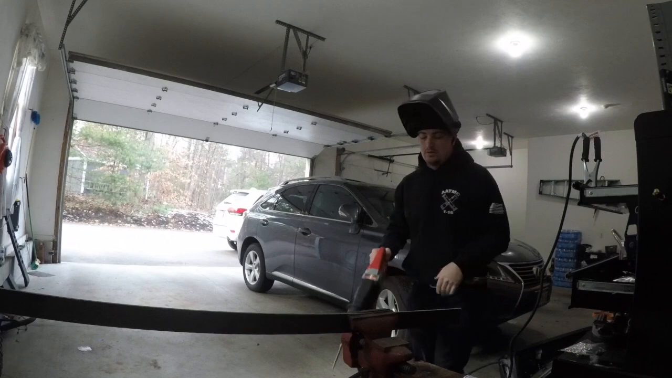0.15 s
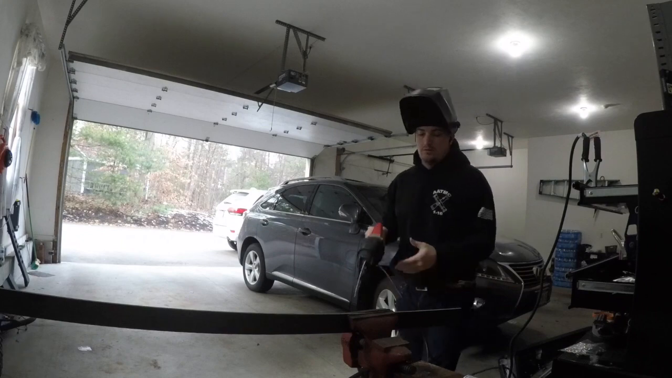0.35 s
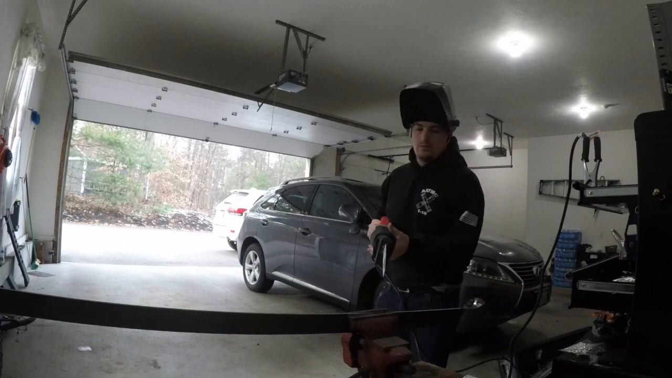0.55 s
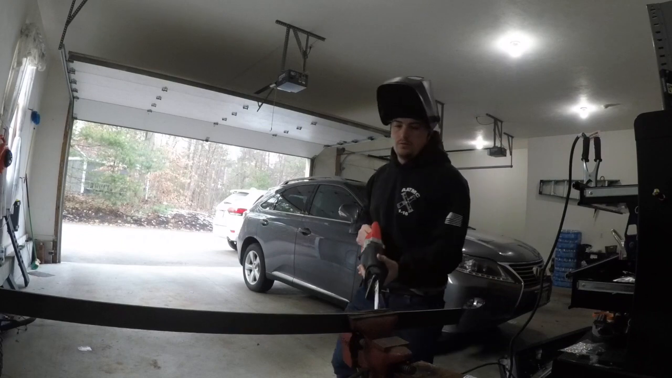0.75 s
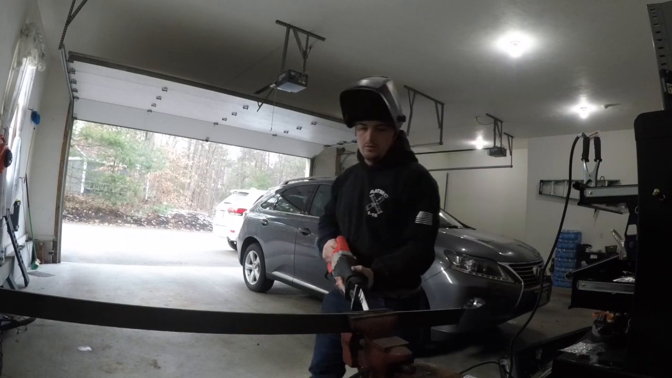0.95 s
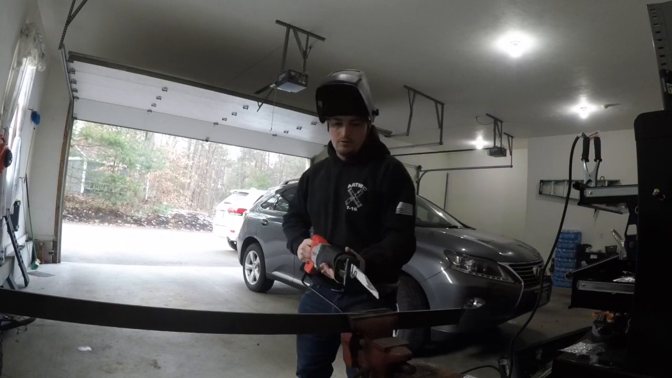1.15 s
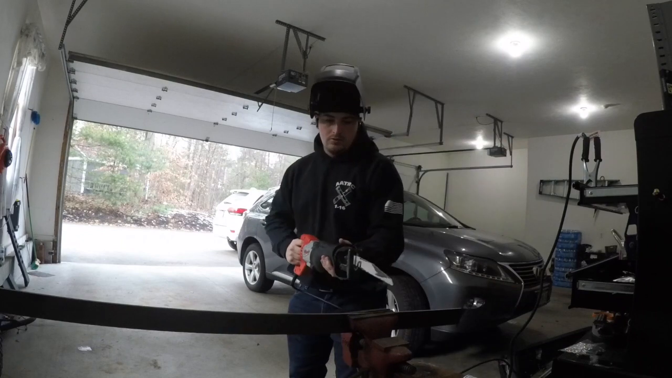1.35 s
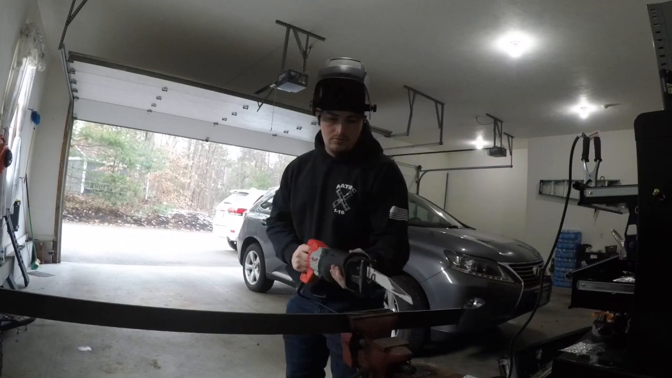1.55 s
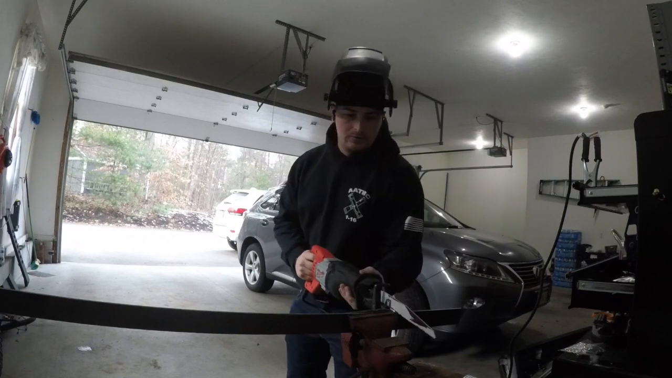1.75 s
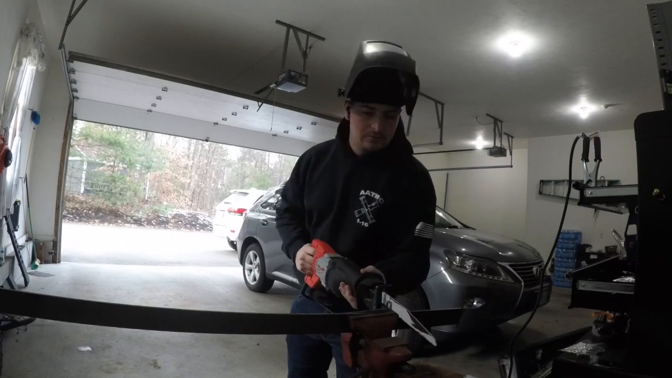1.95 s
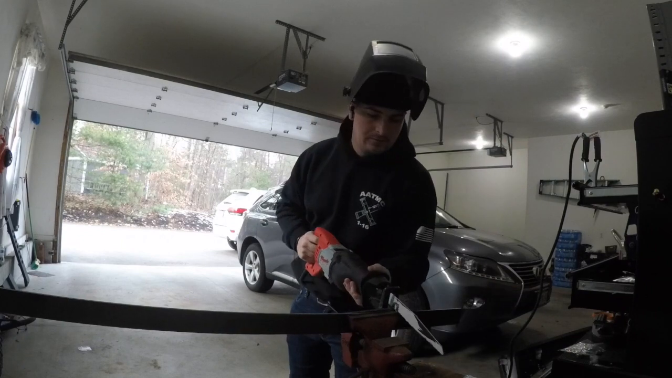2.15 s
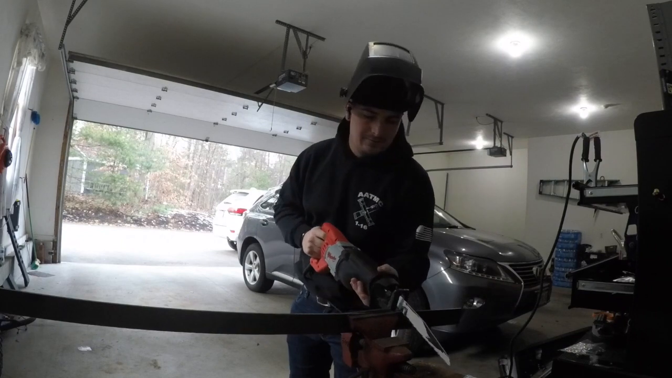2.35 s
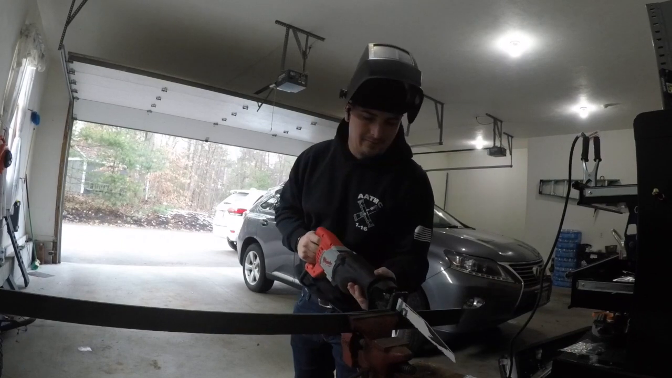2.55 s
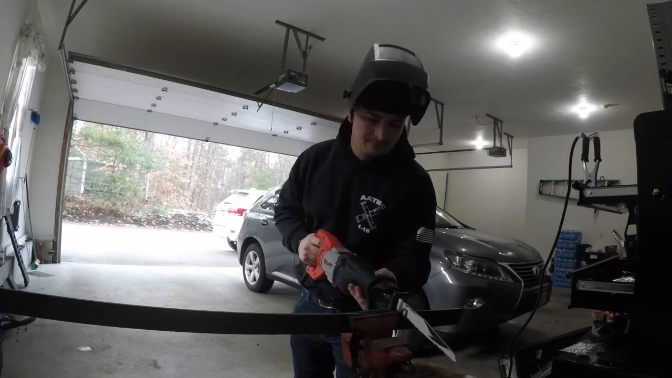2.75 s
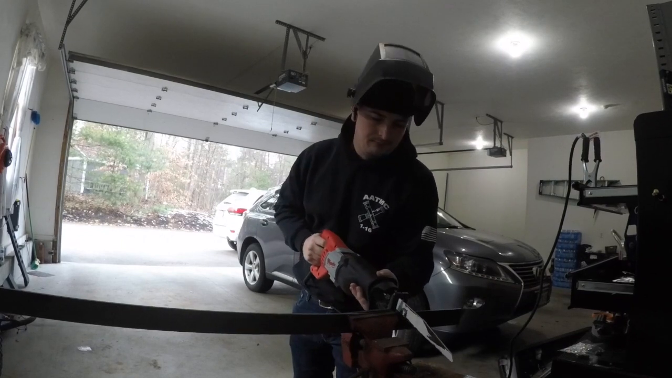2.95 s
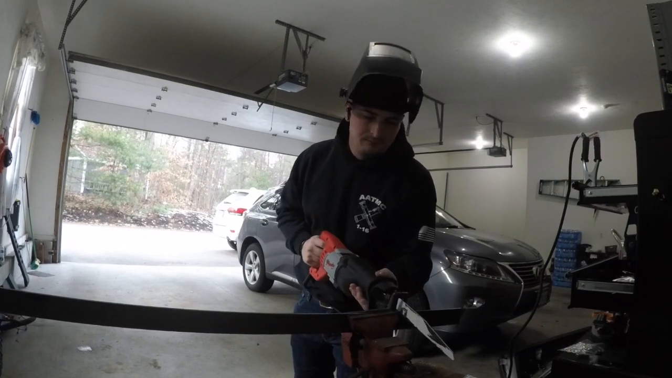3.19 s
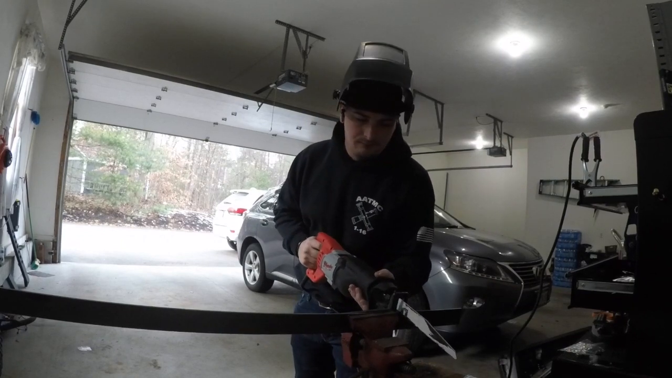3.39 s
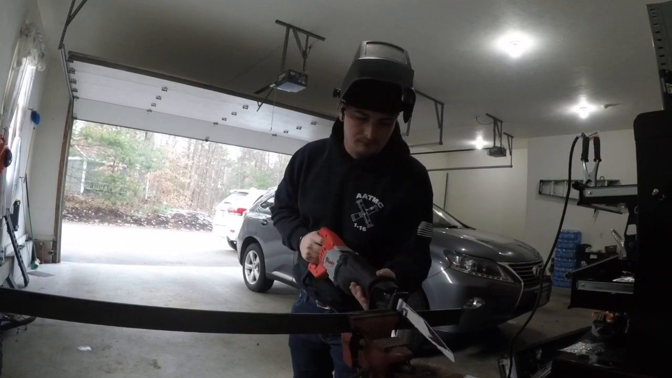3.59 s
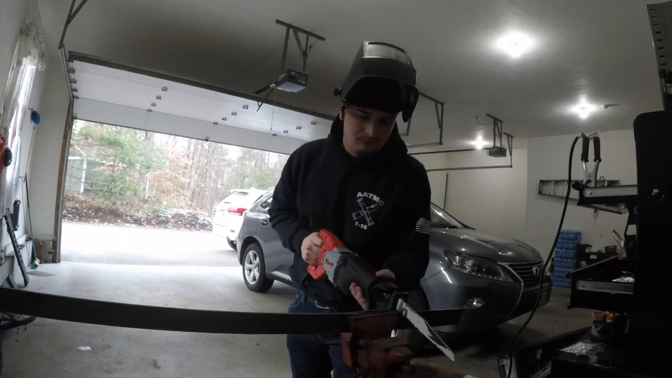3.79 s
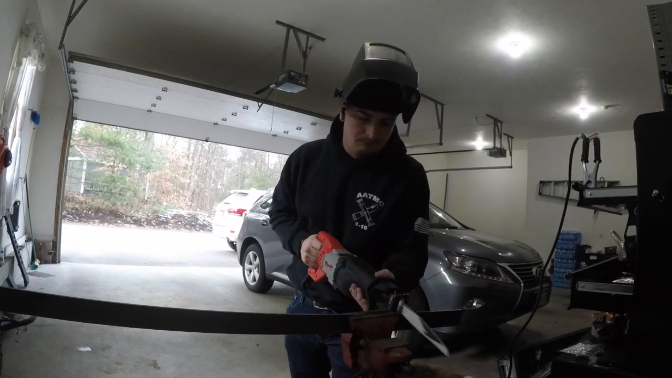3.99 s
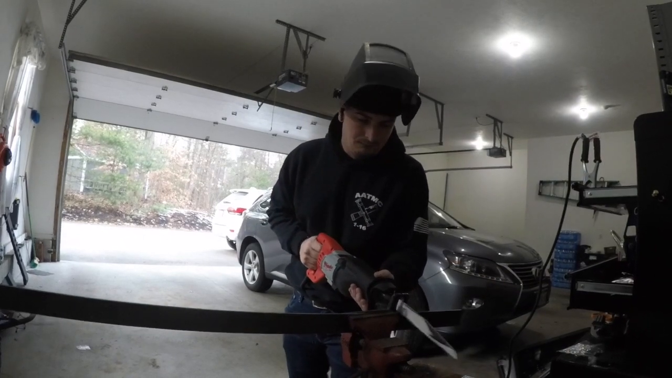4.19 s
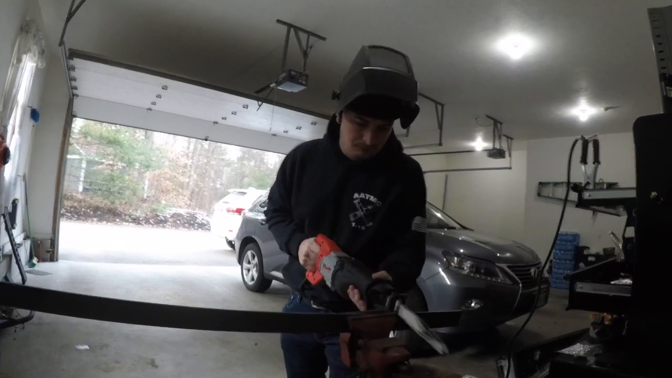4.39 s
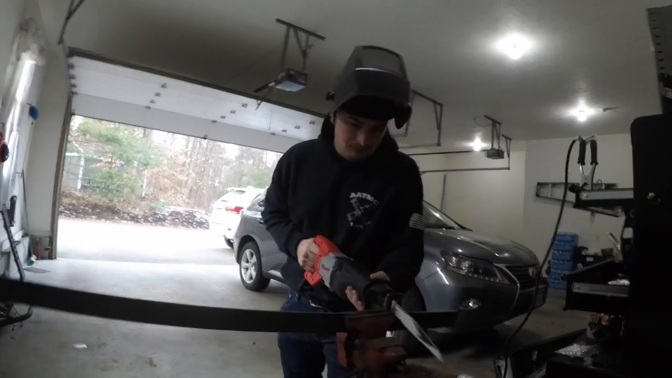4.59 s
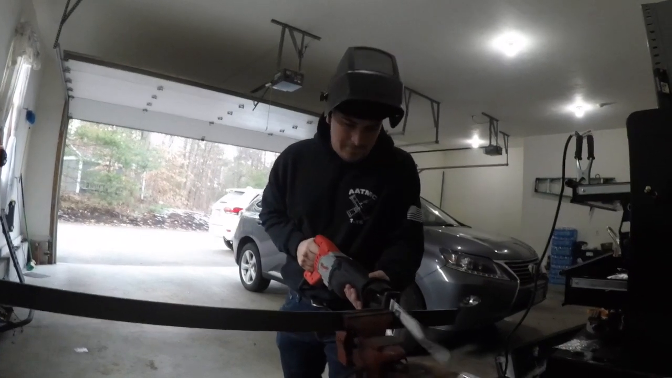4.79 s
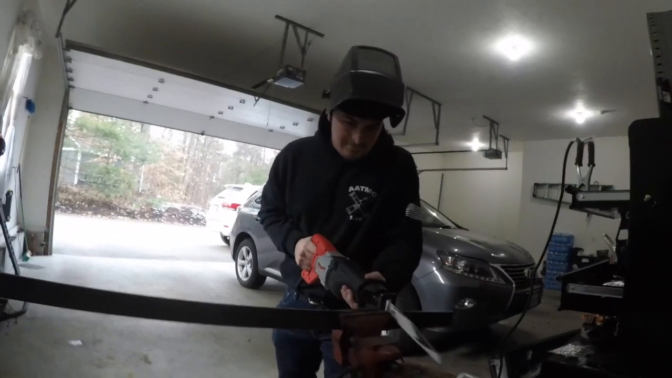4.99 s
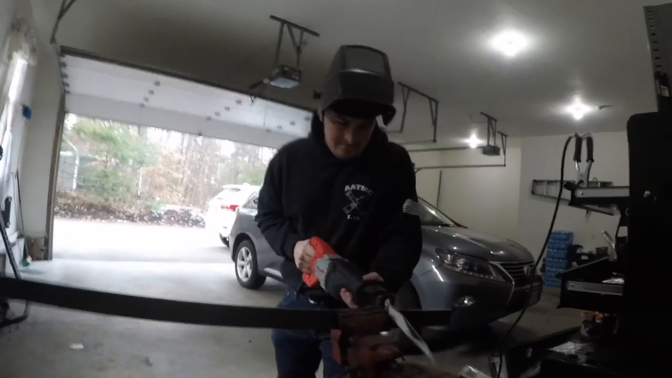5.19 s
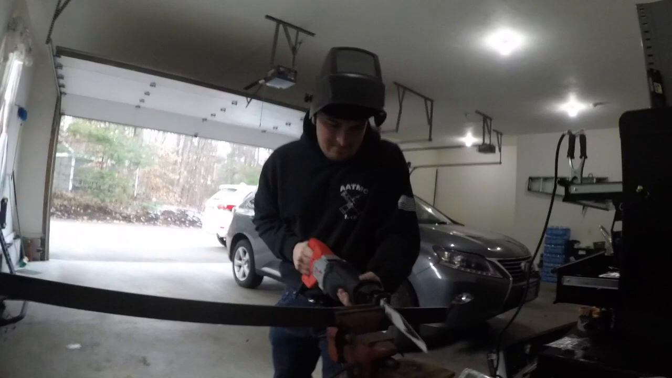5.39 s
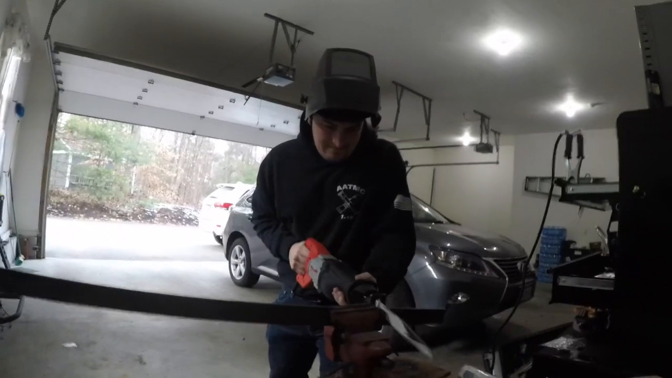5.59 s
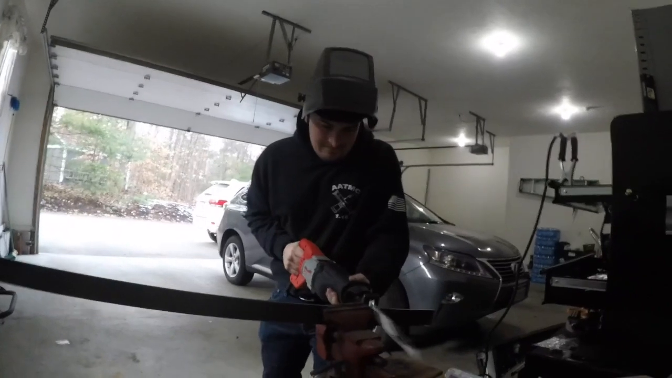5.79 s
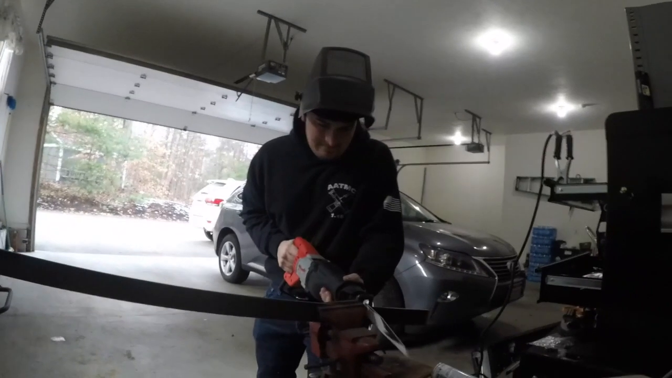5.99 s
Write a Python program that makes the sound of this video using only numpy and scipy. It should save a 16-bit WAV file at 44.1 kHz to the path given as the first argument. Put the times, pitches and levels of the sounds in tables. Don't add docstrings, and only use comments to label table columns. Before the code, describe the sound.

In an open garage, a power saw is handled with rattles and clicks, its blade taps a ringing clamped steel bar, then it cuts with harsh rapid chatter.

```python
import sys
import numpy as np
from scipy import signal
from scipy.fft import rfft, irfft
from scipy.io import wavfile

SR = 44100
rng = np.random.default_rng(int(sys.argv[2]) if len(sys.argv) > 2 else 0)


def elevation(decibels):
    levels = np.asarray(decibels, float)
    return 10 ** (levels / 20)


def master(y):
    cut = np.clip(np.atleast_2d(y).T, -1, 1)
    pcm = np.round(cut * 32767)
    wavfile.write(sys.argv[1], SR, pcm.astype(np.int16))


N = 266364


def rms_one(x):
    return x / np.sqrt(np.mean(x ** 2) + 1e-20)


def in_time(points):
    s, level_db = np.transpose(points)
    return np.interp(np.arange(N) / SR, s, level_db)


def at_hz(points, hz):
    table_hz, values = np.transpose(points)
    return np.interp(np.log(hz), np.log(table_hz), values)


def click_at(s):
    return 1. * (np.arange(N) == int(s * SR))


def colour(x, spectrum):
    cepstrum = irfft(np.log(elevation(at_hz(spectrum, np.linspace(1, SR / 2, 2049)))))
    cepstrum[1:2048] *= 2
    cepstrum[2049:] = 0
    return signal.fftconvolve(x, irfft(np.exp(rfft(cepstrum))))[:N]


def band(x, low_hz, high_hz):
    sos = signal.butter(2, [low_hz, min(high_hz, .45 * SR)], "band", fs=SR, output="sos")
    return signal.sosfilt(sos, x)


def ring(x, hz, t60):
    r = elevation(-60 / (t60 * SR))
    w = 2 * np.pi * hz / SR
    return signal.lfilter([0, np.sin(w)], [1, -2 * r * np.cos(w), r * r], x + 1e-18)


def resonances(x, peaks):
    out = 0
    for hz, width, level_db in peaks:
        r = np.exp(-np.pi * width / SR)
        poles = [1, -2 * r * np.cos(2 * np.pi * hz / SR), r * r]
        out = out + elevation(level_db) * signal.lfilter([1 - r, 0, r - 1], poles, x)
    return out


def grains(per_s, spread_db):
    sizes = elevation(spread_db * np.minimum(rng.exponential(1, N), 4)) * rng.choice([-1, 1], N)
    return rms_one(sizes * (rng.random(N) < per_s / SR))


def pulses(times, levels_db, rise, fall):
    marks = np.zeros(N)
    marks[(np.array(times) * SR).astype(int)] = elevation(levels_db)
    t = np.arange(SR // 4) / SR
    shape = (1 - np.exp(-t / rise)) * np.exp(-t / fall)
    return signal.fftconvolve(marks, shape / shape.max())[:N]


def held(rows, attack_db_per_s, floor_db=-120):
    t = np.arange(N) / SR
    levels = []
    for start, end, level_db, release in rows:
        before, after = np.maximum(start - t, 0), np.maximum(t - end, 0)
        levels.append(level_db - attack_db_per_s * before - release * after)
    return np.maximum(np.max(levels, axis=0), floor_db)


def struck(times, levels_db, modes, scatter_db, damping):
    out, at = np.zeros(N), (np.array(times) * SR).astype(int)
    luck = rng.standard_normal((len(at), len(modes)))
    for k, (hz, level_db, t60) in enumerate(modes):
        clicks = np.zeros(N)
        clicks[at] = elevation(levels_db + level_db + scatter_db * luck[:, k])
        out += ring(clicks, hz, t60 * damping)
    return out


def bursts(times, levels_db, centres_hz, lengths=.004, broad=0, span=1.324):
    noise, out = rng.standard_normal(N + SR), np.zeros(N + SR)
    t = np.arange(SR // 5) / SR
    starts, lengths = (times * SR).astype(int), np.broadcast_to(lengths, len(times))
    for start, level_db, hz, length in zip(starts, levels_db, centres_hz, lengths):
        burst = noise[start:start + len(t)]
        tinted = rms_one(band(burst, hz / span, hz * span))
        shape = (1 - np.exp(-t / (0.046 * length))) * np.exp(-t / length)
        out[start:start + len(t)] += elevation(level_db) * (tinted + broad * band(burst, 1400, 7000)) * shape
    return out[:N]


def background():
    # (frequency [Hz], level [dB])
    yard = [(16, -9.5), (28, -21), (49, -16.5), (117, -25.5), (203, -22), (226, -19.5), (336, -20),
            (373, -18.5), (486, -21.5), (917, -22.5), (1260, -33), (1400, -30), (15500, -55)]
    # (frequency [Hz], width [Hz], rms level [dB])
    hum_lines = [(234, 5.4, -65), (368, 32, -69), (907, 3, -63.5)]
    # (start [s], end [s], level [dB], release [dB/s])
    rustles = [
        (.52, .6, -63.5, 150),
        (.98, 1.1, -53.5, 72),
        (1.93, 1.96, -57.5, 57),
        (2.43, 2.55, -59.5, 69),
        (3.42, 3.5, -77, 32),
    ]
    # (start [s], end [s], level [dB], release [dB/s])
    nudges = [
        (.27, .4, -53, 100),
        (.9, 1.0, -61, 60),
        (1.48, 1.55, -60, 60),
        (1.78, 1.88, -47, 87),
        (2.12, 2.2, -43.5, 29),
        (2.44, 2.53, -39, 187),
        (2.9, 3.0, -51.5, 10),
        (3.45, 3.57, -55, 110),
        (3.76, 3.9, -49, 40),
    ]
    # (time [s], frequency [Hz], level [dB], t60 [s])
    swings = [
        (2.575, 5.25, -31, 6.5),
        (2.79, 20.7, -38, 1.3),
        (2.45, 17, -25, .5),
    ]
    t = np.arange(N) / SR
    noise = rng.standard_normal((4, N))
    hush = elevation(-59.5 + 3) * rms_one(colour(noise[0], yard))
    hiss = elevation(-76) * noise[3]
    hum = 0
    for hz, width, level_db in hum_lines:
        unsteady = resonances(noise[1], [(hz, width, 0)])
        hum = hum + elevation(level_db) * rms_one(unsteady + .4 * np.sin(2 * np.pi * hz * t))
    rustle = elevation(held(rustles, 150, floor_db=-76)) * rms_one(band(noise[2], 1060, 6000))
    sway = np.sqrt(2) * np.sin(2 * np.pi * 21.5 * t)
    creak = elevation(-11.5) * rms_one(band(noise[1], 41, 77))
    nudged = elevation(held(nudges, 160, floor_db=-87)) * (sway + creak)
    swing = sum(elevation(level_db) * ring(click_at(s), hz, t60) for s, hz, level_db, t60 in swings)
    return hush + hiss + hum + rustle + nudged + swing


def ticks():
    # (time [s], crack level [dB], centre [Hz])
    dry_clicks = [(0.8775, -19, 6800), (1.1129, -38, 2397), (1.1797, -36, 2780), (1.96, -22, 3300),
                  (2.3194, -52, 2880), (2.417, -10, 3560), (2.7582, -32.5, 2500), (3.204, -49, 2930),
                  (3.3094, -51, 1520), (3.3856, -47, 4300), (3.4268, -21.5, 4060), (3.8764, -9, 2650),
                  (3.901, -19, 2500)]
    # (time [s], level [dB], centre [Hz], length [s])
    knocks = [(0.05, -43, 130, 0.021), (0.342, -44.5, 300, 0.031), (0.368, -49, 129, 0.046),
              (0.852, -44, 300, 0.022), (0.871, -46, 102, 0.03), (1.586, -53, 232, 0.026),
              (1.961, -43, 8700, .006), (2.381, -31, 9000, .006), (2.417, -31, 7700, .006),
              (2.46, -27, 67, 0.023), (2.6, -47, 75, .06), (2.75, -49, 700, 0.021),
              (2.751, -36.5, 202, 0.016), (2.8, -47, 110, .06), (3.205, -47.5, 1130, 0.014),
              (3.206, -47, 2407, 0.0087), (3.23, -53, 130, 0.024), (3.37, -53, 85, 0.07),
              (3.429, -50, 10650, 0.01), (3.434, -42.5, 1290, 0.011), (3.45, -45.5, 170, 0.025),
              (3.876, -38, 1400, 0.012), (3.88, -33, 300, 0.037), (3.927, -36, 2400, .03),
              (3.933, -46, 9500, .008), (3.951, -21, 1900, 0.04)]
    s, crack_db, centre_hz = np.transpose(dry_clicks)
    return bursts(s, crack_db - 13.5, centre_hz, broad=0.87) + bursts(*np.transpose(knocks))


def rattle():
    # (start [s], end [s], level [dB], release [dB/s])
    shakes = [
        (.8295, .9, -29, 147),
    ]
    # (frequency [Hz], level [dB])
    click_colour = [(120, -40), (200, -1), (842, -5.5), (923, -2), (1070, -9), (2290, 0.5), (3300, -5),
                    (6830, 0), (15500, -30.5)]
    # (frequency [Hz], width [Hz], level [dB])
    chuck = [(2320, 70, -2), (4510, 100, -8), (6770, 90, -2), (7420, 150, -1), (7950, 120, -3),
             (8400, 120, -2), (8930, 120, 0), (10300, 130, -8)]
    clicks = grains(7000, spread_db=3.5)
    voiced = rms_one(colour(clicks, click_colour)) + .4 * rms_one(resonances(clicks, chuck))
    first = bursts(np.array([.829]), [-31], [8400], .025, span=1.1)
    return elevation(held(shakes, attack_db_per_s=20000) - 7.5) * voiced + first


def taps():
    # (time [s], crack level [dB], bar ring level [dB], crack centre [Hz])
    touches = [(1.735, -17.5, -27, 7160), (1.9014, -26, -45, 2950), (1.926, -46, -44, 2930),
               (2.0679, -20, -35.5, 2760), (2.098, -25, -76, 2930), (2.1435, -17, -35.5, 3000),
               (2.195, -19, -32, 3030), (2.382, 0.5, -23, 2700), (2.401, -5, -24, 1360),
               (2.4313, -7, -56, 2280), (2.4697, -21, -37, 2960)]
    # (frequency [Hz], level [dB], t60 [s])
    bar = [(490, -2, .35), (807, -8, .45), (1260, -7, .25), (1340, -1, .35), (2040, -12, .16),
           (2250, -11, .3), (2719, -9, .12), (2840, -7, .3), (2934, 1, .16), (2960, -8, .35),
           (3550, -24, .2), (4690, -17, .2), (4760, -17, .2), (6780, -21, .18), (6860, -22, .15),
           (8300, -22, .12), (8650, -23, .13), (9400, -21, .13), (9550, -23, .13), (11390, -28, .13),
           (12000, -29, .12)]
    # (start [s], end [s], level [dB], release [dB/s])
    chatter = [
        (1.738, 1.79, -24.5, 150),
        (1.82, 1.87, -38, 100),
        (1.9, 1.96, -36, 200),
        (2.07, 2.11, -37, 200),
        (2.145, 2.17, -44, 200),
        (2.2, 2.27, -40, 150),
        (2.384, 2.42, -27, 200),
        (2.45, 2.62, -36.5, 90),
    ]
    # (start [s], end [s], level [dB], release [dB/s])
    rests = [
        (1.736, 1.79, -35.5, 200),
        (1.79, 1.96, -41, 94),
        (2.068, 2.26, -43, 180),
        (2.386, 2.41, -29.5, 131),
    ]
    # (frequency [Hz], width [Hz], level [dB])
    vice = [(237, 54, 10.5), (350, 160, -10), (462, 43, 5), (680, 150, -39), (794, 20, -12),
            (1350, 30, -3.5)]
    # (frequency [Hz], level [dB], t60 [s])
    jaw_modes = [(244, 1, 0.24), (486, -31, 0.22)]
    s, crack_db, ring_db, centre_hz = np.transpose(touches)
    contact = grains(1500, spread_db=2.0)
    rubbing = contact * elevation(held(chatter, attack_db_per_s=2000) - 53)
    rub = sum(elevation(level_db * 0.57) * ring(rubbing, hz, t60 * 0.31) for hz, level_db, t60 in bar)
    blows = struck(s, ring_db - 8.5, bar, scatter_db=2.5, damping=0.62)
    cracks = bursts(s, crack_db - 19.5, centre_hz, broad=0.9, span=1.23)
    jaws = struck(s, ring_db / 2 - 23.5, jaw_modes, scatter_db=0.5, damping=1)
    hum = rms_one(band(resonances(contact, vice), 110, 1900))
    return cracks + blows + rub, jaws + elevation(held(rests, attack_db_per_s=2000) - 3.5) * hum


def strokes():
    # (time [s], bite level [dB], bench thump level [dB], squeal centre [Hz])
    ordinary = [(4.107, -6.5, -17.5, 3400), (4.135, -5, -14, 3130), (4.1648, -1.5, -23, 3370),
                (4.1914, -5, -18, 3490), (4.2198, -3.5, -17, 3400), (4.2455, -1, -12, 3820),
                (4.2996, -5.5, -11.5, 2870), (4.3293, -5, -11.5, 3300), (4.3522, -7.5, -14, 2530),
                (4.3812, -5, -9, 3290), (4.4085, -7, -16, 3370), (4.4849, -7, -18, 3350),
                (4.5204, -5, -21, 3900), (4.5435, -6, -13, 3130), (4.5698, -6.5, -18.5, 3260),
                (4.5972, -12, -27, 3010), (4.624, -8, -23, 3320), (4.6513, -7, -22, 3320),
                (4.6815, -3.5, -22, 3230), (4.7053, -3.5, -27, 3340), (4.7317, -5.5, -14, 7350),
                (4.789, -5.5, -14, 2850), (4.8193, -5.5, -15, 7810), (4.8453, -5.5, -19, 3300),
                (4.9034, -3.5, -16.5, 4060), (4.9364, -3.5, -13, 3700), (4.9934, -10, -17, 3940),
                (5.0241, -6.5, -15, 5100), (5.0589, -8.5, -26, 4980), (5.0825, -5.5, -18, 3700),
                (5.1123, -5, -16, 8300), (5.23, -7, -17, 3500), (5.2607, -10.5, -20, 6470),
                (5.2916, -5, -18, 3690), (5.4966, -3.5, -15, 3850), (5.527, -9, -15.5, 3600),
                (5.5565, -3, -11.5, 4600), (5.5873, -3, -18, 3920), (5.619, -5.5, -18, 9000),
                (5.6482, -5.5, -16, 4010), (5.6784, -6, -16.5, 4010), (5.7385, -6, -13.5, 3320),
                (5.7678, -5, -17, 4080), (5.7978, -4, -20, 7500), (5.8292, -5.5, -13.5, 7600),
                (5.887, -5, -15, 3400), (5.915, -4.5, -18.5, 3280), (5.9758, -2, -17.5, 4970)]
    # (time [s], bite level [dB], bench thump level [dB], squeal over the bite [dB], squeal centre [Hz])
    odd = [(3.9452, 0, -2.5, -1, 3480), (3.956, -2, -4, -3, 2500), (4.0086, -1.5, -5, 4.5, 3700),
           (4.0439, 1, -17, 1.5, 3100), (4.075, 0, -10, -24, 11200), (5.435, -2.5, -32, 0.5, 3900),
           (4.2752, -3, -6.5, 5.5, 3530), (4.437, -3, -10, 0, 3500), (4.4607, -13, -25, -12, 3080),
           (4.7612, -13, -10, 4.5, 3250), (4.8762, -2, -4.5, -1, 3800), (4.965, 0.5, -0.5, -12, 4040),
           (5.171, -4.5, -2.5, 5.5, 8260), (5.2025, -6, -2, 8.5, 8300), (5.1405, -4, -34, -2, 4240),
           (5.3215, -5.5, -13, -12, 3400), (5.348, -2, -20, -2, 8650), (5.3791, -6, -17.5, 4.5, 8000),
           (5.407, -2.5, -4.5, 3, 6900), (5.466, -1, -7.5, -12, 4300), (5.7075, -2, -12, 2, 7550),
           (5.8566, -3, -16, 5.5, 8140), (5.9462, -4.5, -31, 4.5, 7640), (6.0017, -6, -14, 10.5, 7950)]
    s, bite_db, thump_db, hz = np.transpose(ordinary)
    squeal_db = -3 + 1.9 * rng.standard_normal(len(s))
    plain = np.transpose([s, bite_db + 2.0, thump_db + 5.0, squeal_db, hz])
    rows = np.vstack([plain, odd])
    snap_db = -13.5 + 1.3 * rng.standard_normal(len(rows))
    return *rows[np.argsort(rows[:, 0])].T, snap_db


def bench(s, thump_db, teeth, running, depth):
    # (frequency [Hz], level [dB], t60 [s])
    bench_modes = [(157, -9, 0.045), (185.7, 4.5, 0.079), (233, -11, 0.42), (274, 2, 0.086),
                   (300.4, -9.5, 0.26), (353, -5, 0.22), (420, -8, 0.12), (515, -13, 0.031),
                   (592, -16.5, 0.26), (819, -9.5, 0.2)]
    # (frequency [Hz], level [dB], t60 [s])
    jolt_modes = [(148.4, -17, 3.8), (177, -15, 0.36), (252, -7.5, 0.61), (225.4, -18, 2.6),
                  (460, -14.5, 0.34), (500, -19, 0.75)]
    crank_hz = 99.5
    crank_modes = [(crank_hz, 0, .3), (crank_hz * 2 / 3, -10, .3), (368, -3, .25)]
    shake_db, push_db = -16.5 - 5 * depth, -32 + 6 * depth
    thumps = struck(s + 0.00279, thump_db - 9.0, bench_modes, scatter_db=4.5, damping=0.44)
    shudder = sum(elevation(level_db) * ring(teeth, hz, t60) for hz, level_db, t60 in bench_modes)
    crank = struck(s, 0, crank_modes, scatter_db=3, damping=1)
    vice_sway = rms_one(band(band(rng.standard_normal(N), 14, 38), 14, 38))
    steady = elevation(shake_db - 5.0) * rms_one(shudder) + elevation(-27) * vice_sway + elevation(push_db - 1.0) * crank
    catch = click_at(s[0])
    jolt = sum(elevation(level_db) * ring(catch, hz, t60) for hz, level_db, t60 in jolt_modes)
    return band(thumps, 90, 3000) + jolt + running * steady


def cutting(s, bite_db, squeal_db, squeal_hz, snap_db, teeth, running, depth):
    # (frequency [Hz], density [dB per Hz])
    tooth_colour = [(290, -34), (500, -1.5), (1040, -6.5), (1180, -6.5), (2330, -9), (3240, -10),
                    (5830, -9.5), (8480, -6.5), (10500, -15.5), (14400, -16.5), (15500, -9.5)]
    # (frequency [Hz], width [Hz], level [dB])
    blade_peaks = [(768, 65, -3.5), (1182, 89, 4.5), (1582, 46, -2), (1822, 130, -2.5), (2870, 45, -5.5),
                   (3260, 143, 2.5), (4290, 126, -3.5), (6200, 52, -6), (8190, 64, -5), (8870, 57, -5)]
    # (frequency [Hz], width [Hz], level [dB])
    bar_peaks = [(484, 25, 4), (2870, 80, -6), (4690, 50, -5), (5250, 60, -5), (6520, 100, -8),
                 (7770, 68, -3), (8670, 43, 1), (9370, 70, 1), (9550, 60, -1), (11380, 70, 3),
                 (12000, 90, -2), (12800, 83, -3), (14000, 90, -4)]
    # (time [s], level [dB], centre [Hz])
    second_bites = [(3.965, 9, 3300), (3.98, 0, 7800), (4.363, -2, 6800), (4.3864, -7, 5000),
                    (4.4623, -5, 3130), (4.514, 5, 3000), (4.6074, 2, 4520), (4.711, 5, 8300),
                    (4.738, 3, 7000), (5.08, -5, 5000), (5.2374, -12, 3890), (5.352, 2, 3360),
                    (5.565, -6, 6040), (5.595, -4, 8000), (6.0304, 11, 4170)]
    # (time [s], level [dB])
    settling = [
        (3.9, -31),
        (4.3, -31),
        (4.7, -33),
        (4.85, -42),
        (6.04, -44),
    ]
    slip_s, slip_db, slip_hz = np.transpose(second_bites)
    free_db = in_time(settling)
    blade = rms_one(resonances(teeth, blade_peaks))
    voiced = rms_one(colour(teeth, tooth_colour)) + elevation(-15.5) * blade
    stroke = pulses(s - .001, bite_db - 10.0, rise=0.0018, fall=0.0036)
    drag = pulses(s + 0.0043, bite_db - 23.0, rise=0.0038, fall=0.014)
    snap = pulses(s, bite_db + snap_db - 10.5, rise=.0009, fall=0.0023) * rms_one(band(teeth, 9000, 13100))
    squeal = bursts(s + 0.0014, bite_db + squeal_db - 10.0, squeal_hz, span=1.12)
    slips = bursts(slip_s, slip_db - 21, slip_hz, broad=1.0, span=1.25)
    grind_db = -10 - 3.5 * depth
    grind = running * elevation(grind_db - 14.0) * (band(voiced, 220, 6630) + elevation(-13.5) * blade)
    whistle = rms_one(resonances(teeth, [(14700, 400, 0)]))
    air = (stroke + drag) * voiced + grind + squeal + snap + slips
    air = air + (running * elevation(-47) + elevation(-22) * stroke) * whistle
    air = air + running * elevation(free_db - 3.5) * band(voiced, 9300, 10700)
    return air + elevation(free_db) * rms_one(resonances(air, bar_peaks))


def saw():
    s, bite_db, thump_db, squeal_db, squeal_hz, snap_db = strokes()
    t = np.arange(N) / SR
    depth = np.interp(t, [s[0], s[-1]], [0, 1])
    running = np.clip((t - s[0]) / 0.005, 0, 1)
    teeth = grains(9000, spread_db=2.0)
    air = cutting(s, bite_db, squeal_db, squeal_hz, snap_db, teeth, running, depth)
    return air, bench(s, thump_db, teeth, running, depth)


def garage(x):
    # (frequency [Hz], t60 [s])
    decay = [(150, 0.94), (1000, 1), (4000, 0.28), (12000, 0.46)]
    t, tail = np.arange(SR) / SR, 0
    noise = rng.standard_normal((2, SR))
    for k, hz in enumerate(100 * 2 ** np.arange(0, 7.5, .5)):
        tail = tail + band(noise[k % 2], hz, hz * np.sqrt(2)) * elevation(-60 * t / at_hz(decay, hz))
    tail = tail * np.clip((t - .006) / 0.035, 0, 1)
    return signal.fftconvolve(x, tail / np.sqrt(np.sum(tail ** 2)))[:N]


def scene():
    tick, loose = ticks(), rattle()
    tap, vice = taps()
    cut, shake = saw()
    wet = elevation(-12.0) * tick + elevation(-11.5) * loose + elevation(-14.0) * tap + elevation(-10) * cut + elevation(-13.5) * shake
    return (background() + tick + loose + tap + vice + cut + shake + garage(wet))[None]


def band_limit(x):
    return signal.sosfilt(signal.butter(12, 15800, fs=SR, output="sos"), x)


def record(dry):
    limited = np.tanh(dry * 1.05) * .96
    mix = signal.sosfilt(signal.cheby2(12, 60, 16000, fs=SR, output="sos"), limited)
    return band_limit(mix)


dry = scene()
out = record(dry)
master(out)
```